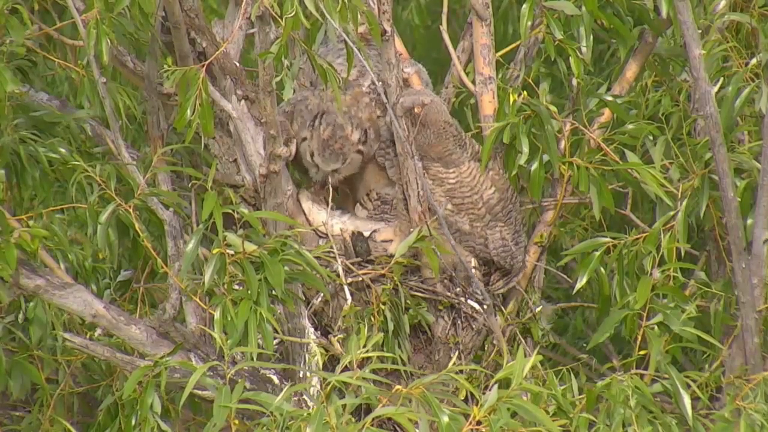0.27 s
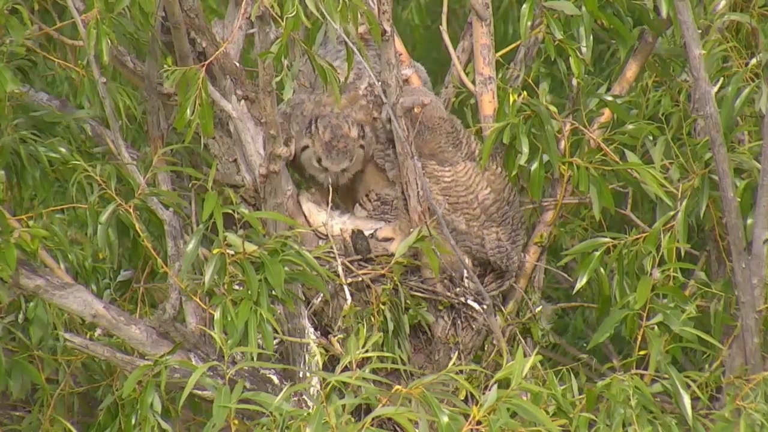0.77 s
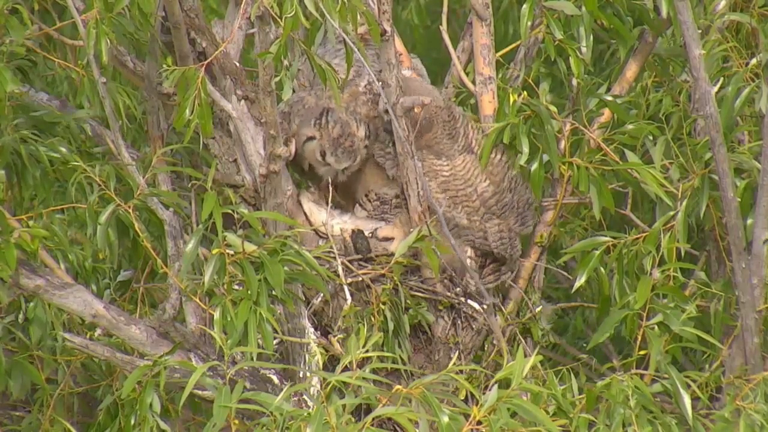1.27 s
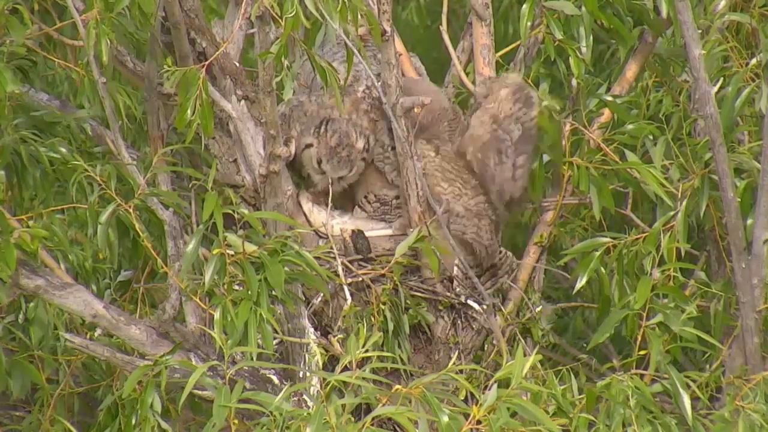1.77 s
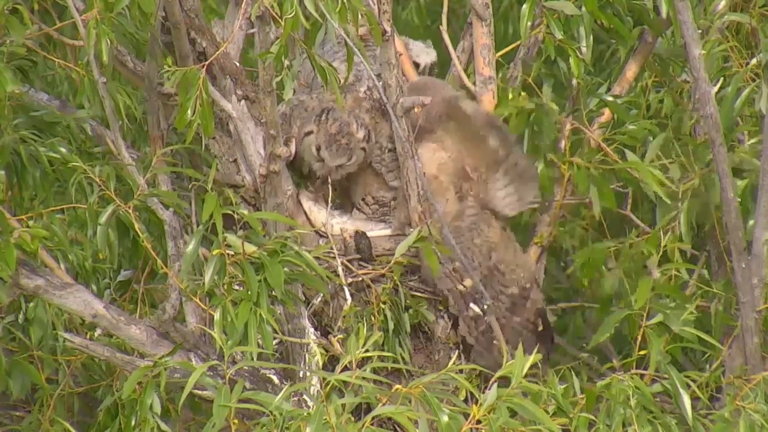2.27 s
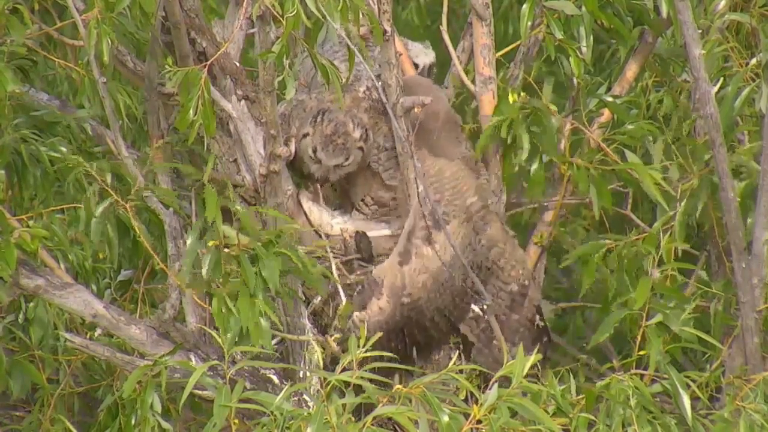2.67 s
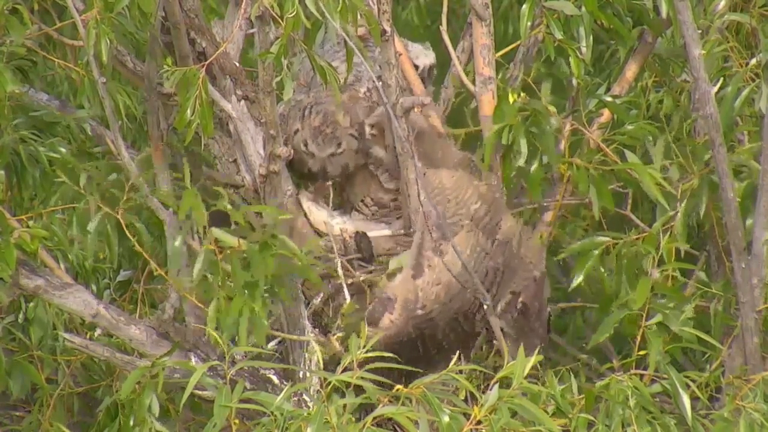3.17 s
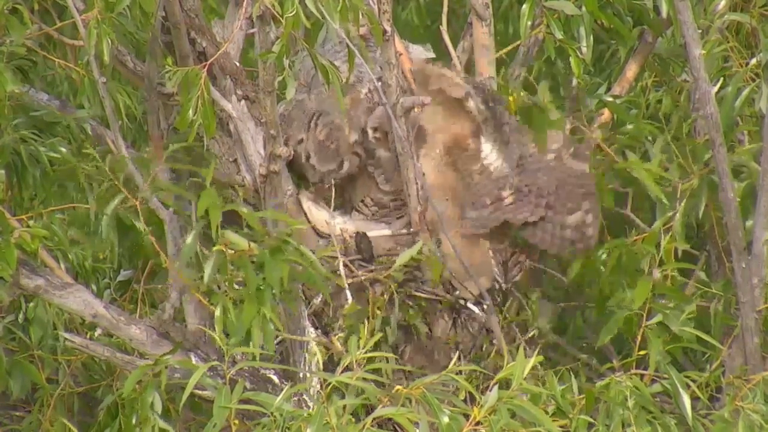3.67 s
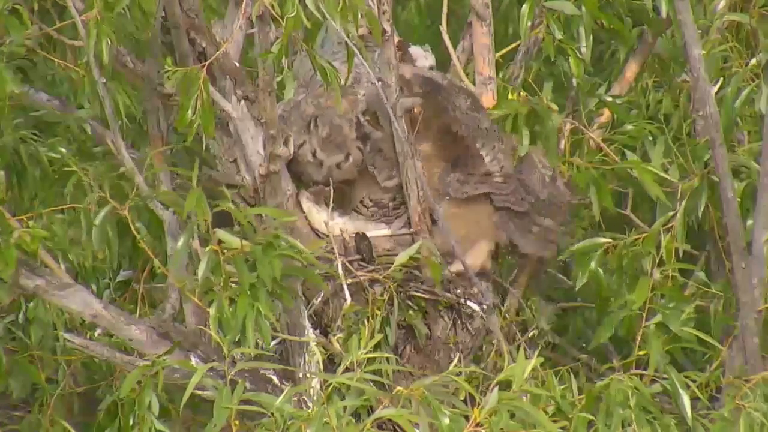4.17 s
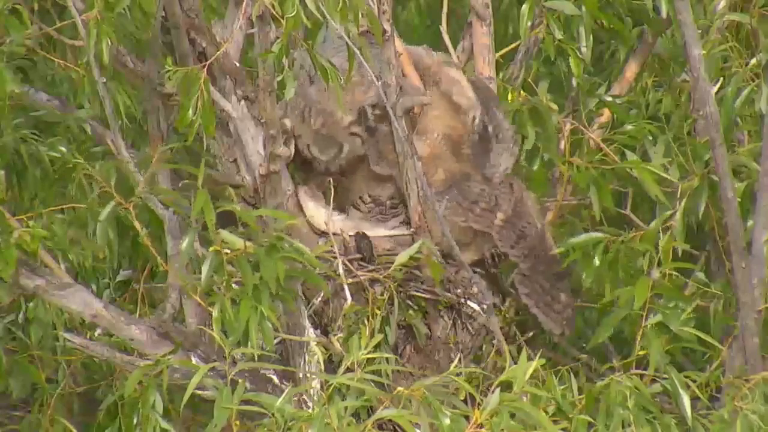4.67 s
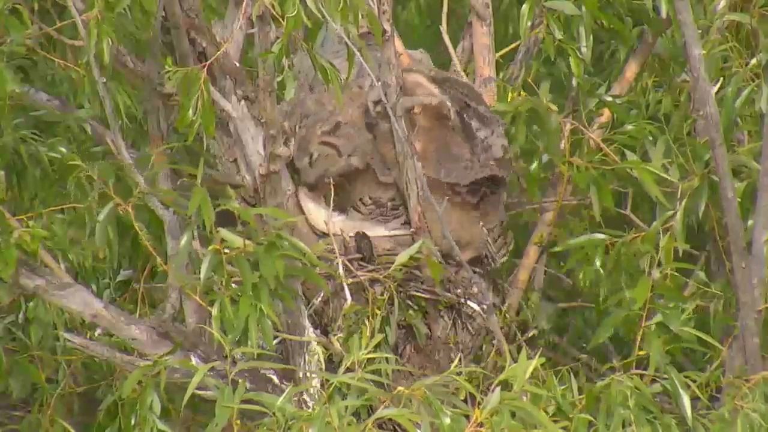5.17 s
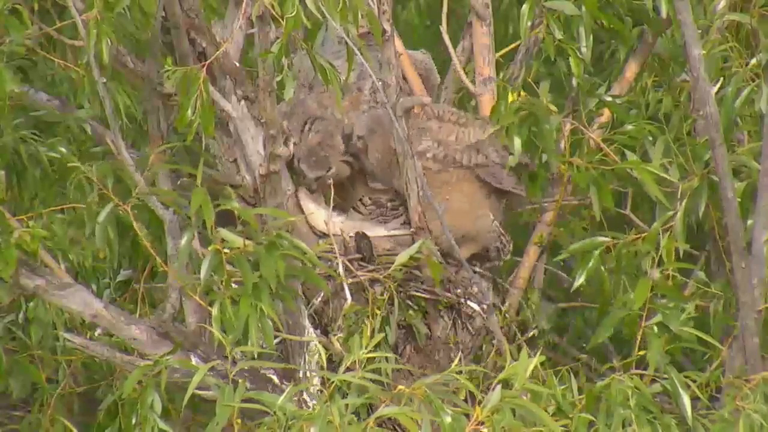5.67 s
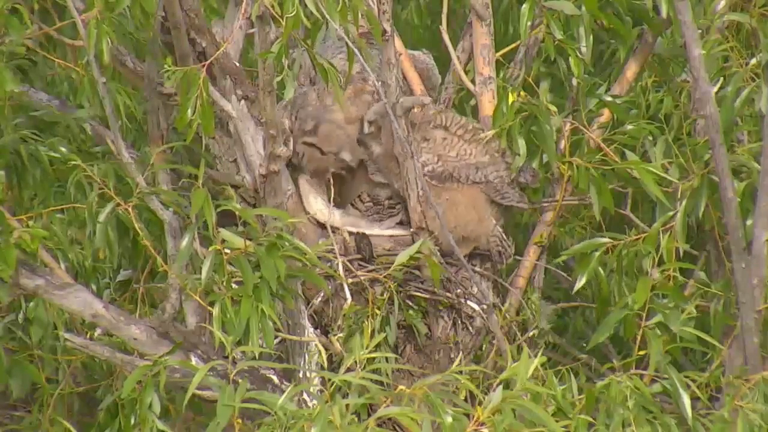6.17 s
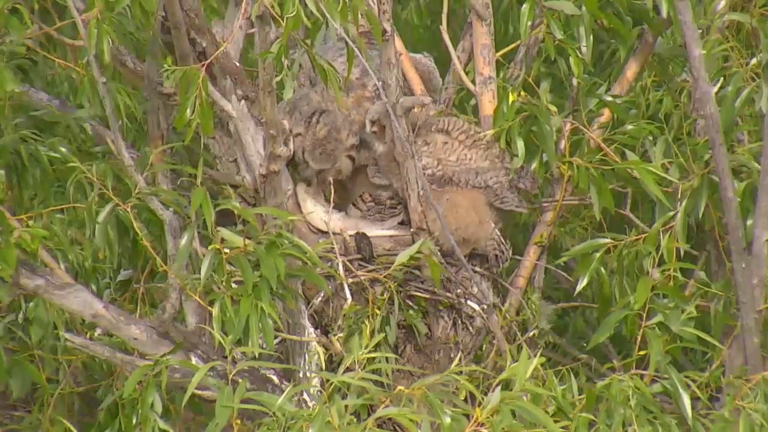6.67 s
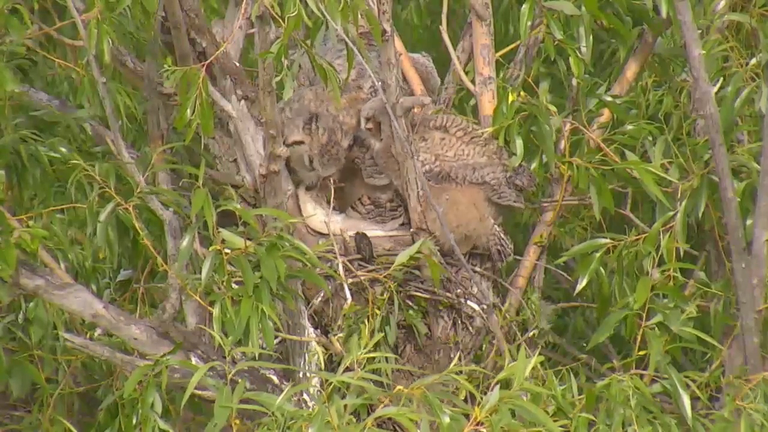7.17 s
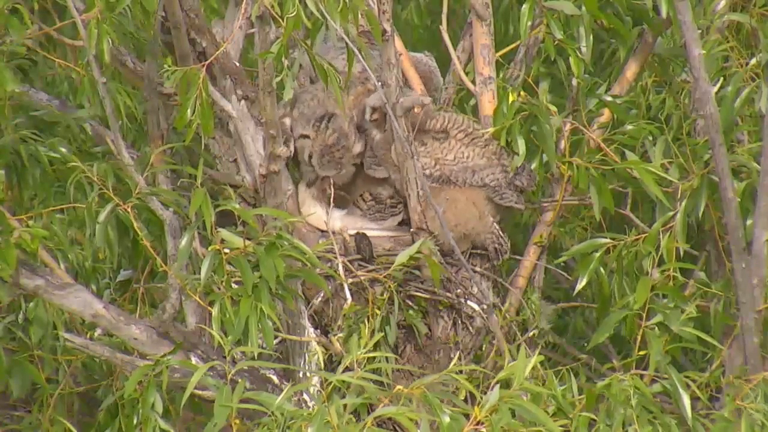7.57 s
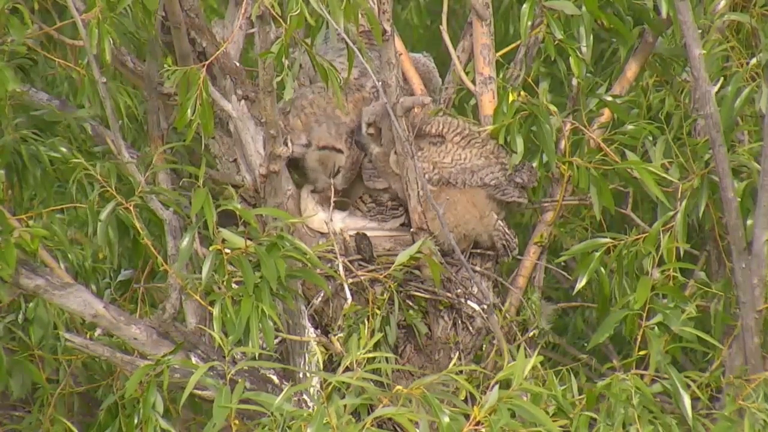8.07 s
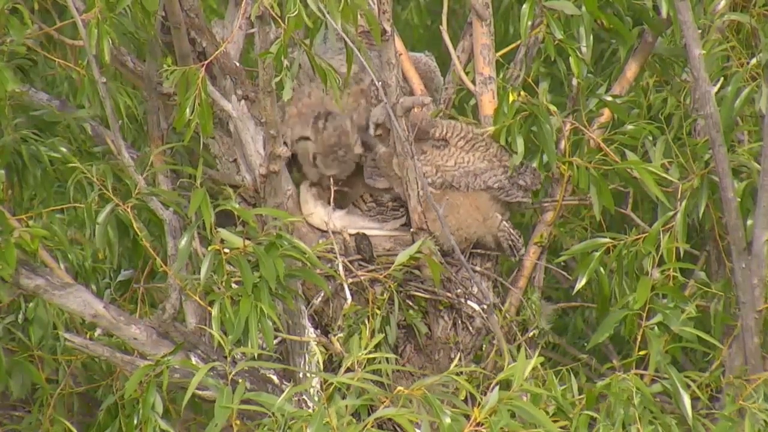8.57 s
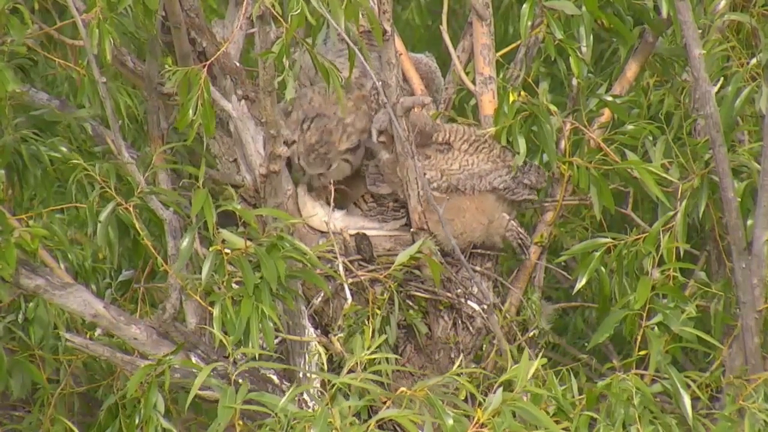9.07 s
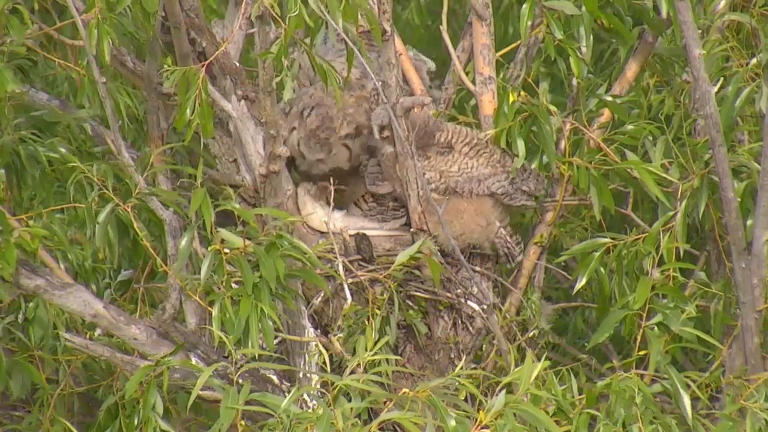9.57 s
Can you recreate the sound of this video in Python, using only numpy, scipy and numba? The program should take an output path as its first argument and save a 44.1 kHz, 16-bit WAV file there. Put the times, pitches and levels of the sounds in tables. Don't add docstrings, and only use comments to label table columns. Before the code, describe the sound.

Young owls in a tree nest give hoarse rasping begging calls, croaks and rising whines, with sharp beak snaps over low air rumble and faint hum.

```python
import sys
import numpy as np
from scipy import signal
from scipy.fft import rfft, irfft
from scipy.io import wavfile
from scipy.ndimage import uniform_filter1d
from numba import njit

SR = 44100
rng = np.random.default_rng(int(sys.argv[2]) if len(sys.argv) > 2 else 0)


def output_pcm(signal):
    pcm = np.clip(np.atleast_2d(signal).T, -1, 1) * 32767
    wavfile.write(sys.argv[1], SR, np.round(pcm).astype(np.int16))


def field_ratio(decibels):
    return 10 ** (np.asarray(decibels, dtype=float) / 20)


N = 432621
T = np.arange(N) / SR

# t/s, length/s, peak level/dB, place of peak/0-1, beak over throat/dB
RASPS = [
    [(-0.08, 0.5, -48.5, 0.34, 5)],
    [(8.084, 0.54, -49, 0.57, 1)],
    [(0.764, 0.57, -49.5, 0.56, -0.5)],
    [(3.289, 0.87, -52, .62, -2.5)],
    [(5.645, 0.56, -49, 0.72, -3.5)],
    [(2.42, 0.59, -52, 0.35, -8.5), (4.62, 0.67, -58, 0.1, -5.5), (6.93, .59, -50, 0.43, -7.5),
     (8.67, 0.35, -55.5, 0.6, -7), (9.09, 0.73, -56.5, 0.14, -4.5)],
]
# throat rise/dB, throat fall/dB, beak rise/dB, beak fall/dB, beak lead/0-1
MANNERS = [(4, 9.5, 15, 7, 0.02), (7.5, 3, 11.5, 4.5, 0), (6, 6, 12, 22.5, 0.24), (8.5, 15, 11, 48, 0.15),
           (11, 6, 4.5, -1, 0), (12, 13.5, 21, 19, 0.08)]
# f/Hz, level per Hz/dB
TRACTS = [
    [(1700, -33), (2350, -17), (2600, -16), (3000, -7), (3800, -3.5), (4450, -17), (4950, -16), (5500, -33)],
    [(1240, -35), (2370, -25), (2800, -9.5), (3500, -5), (3780, -1.5), (4100, -5), (5000, -11),
     (6500, -33.5)],
    [(1290, -60), (2300, -26), (2760, -21), (3050, -3), (3410, -10), (3670, 5), (4300, -6), (5300, -36)],
    [(1290, -32), (2630, -15.5), (2870, -6), (3180, -0.5), (4300, -14.5), (4750, -25), (5050, -25),
     (5700, -35)],
    [(1290, -28), (2230, -7), (2390, -18.5), (2680, -1), (3190, 11), (3450, 1), (5000, -15.5), (6500, -39)],
    [(1290, -50), (2300, -20), (2700, -7), (3170, 0.5), (3700, -15), (4350, -20), (5000, -37), (6500, -62)],
]
# f/Hz, level per Hz/dB
TRACT_END = [(11000, -120)]
# t/s, pitch f/Hz, effort level/dB
WHINES = [
    [(6.03, 611.4, -38), (6.07, 677, -45), (6.11, 689.6, -31), (6.18, 743, -38.5), (6.25, 777, -42),
     (6.31, 850, -38), (6.36, 888, -44), (6.41, 916, -44.5), (6.48, 915, -59)],
    [(6.895, 571.5, -36), (6.915, 605, -33.5), (6.965, 695, -30), (7., 730, -36), (7.04, 765, -44.5),
     (7.08, 780, -52)],
]
WHINE_CHEST = (-4, 10)
WHINE_TOP = [-34, -32]
# f/Hz, level/dB
WHINE_THROAT = [(1200, -49.5), (1600, -30), (2150, -27), (2360, -13.5), (2550, -7), (2900, -4), (3150, 0),
                (3560, -18)]
# t/s, length/s, peak level/dB, place of peak/0-1, low resonance at start f/Hz
CROAKS = [
    (0.688, 0.19, -48.5, 0.76, 1450),
    (1.314, .14, -43.5, 0.6, 1300),
    (4.471, .115, -41, 0.6, 1130),
    (5.814, 0.13, -48, 0.45, 1250),
]

# t/s, length/s, start f/Hz, end f/Hz, level/dB
STRANDS = [(2.68, .09, 3490, 3256, -43.5), (6.277, 0.076, 2550, 3050, -39.5),
           (6.29, 0.1, 1400, 2058, -56.5), (6.365, 0.0303, 2010, 1305, -60), (6.39, .09, 1970, 1980, -63),
           (8.715, 0.102, 3324, 3386, -52), (8.8, 0.1484, 3385, 3354, -51), (8.71, .03, 4165, 4200, -63),
           (8.775, 0.033, 4130, 4150, -59), (8.89, 0.034, 4194, 4070, -62)]
STREAKS = [(.69, 0.16, 2810, 3100, -54.5), (.78, .2, 4490, 4340, -55), (0, 0.43, 5000, 5060, -55.5),
           (3.31, .13, 3810, 4000, -55), (3.78, 0.26, 3460, 3200, -54), (6.26, 0.15, 3300, 3650, -56),
           (4.64, 0.31, 3180, 3170, -60), (6.1, 0.19, 2950, 3150, -45), (6.2, 0.22, 2450, 2950, -46.5),
           (6.96, 0.14, 2688, 2800, -43.5), (9.2, 0.532, 3240, 3320, -55)]
VOICED = [
    (.03, .2, 1170, 1222, -58),
    (.24, .19, 1228, 1160, -58),
    (6.06, .14, 1250, 1130, -68),
]
BREATHY = [
    (3.3, .33, 1140, 1270, -78),
    (5.7, .3, 1180, 1273, -76),
    (8.12, .5, 1210, 1233, -68),
]
YELPS = [(.815, .025, 1400, 1550, -54), (1.378, .025, 1150, 1600, -49), (3.455, .022, 1120, 1200, -55),
         (5.855, .03, 950, 1400, -54), (5.88, .03, 1200, 1600, -55)]
ARCHES = [(.838, .024, 1200, 1250, -53), (1.4, .042, 1000, 1250, -44), (4.541, .04, 1030, 1270, -41),
          (5.9, .055, 1050, 1140, -53)]
BEAK_OPENS = [(.765, .03, 3700, 4600, -58), (4.562, .022, 3200, 3900, -52), (5.643, .035, 3200, 5200, -57),
              (8.085, .04, 3200, 5600, -66)]
BEAK_SHUTS = [(.35, .075, 5150, 4800, -57), (6.11, .088, 5400, 3700, -60), (8.6, .045, 6400, 2600, -65)]
WHISTLES = [
    (.56, .11, 960, 950, -69),
    (2.43, .1, 3400, 3750, -64),
    (5.36, .22, 4200, 4080, -74),
    (6.69, .07, 2130, 2120, -59),
    (6.75, .12, 4150, 4150, -79),
    (8.67, .05, 3650, 3620, -65),
    (9.68, .14, 4100, 4080, -70),
]
# multiple, level/dB
VOICED_ORDERS = [(1, 0), (2, -6.5)]
# multiple, level/dB
YELP_ORDERS = [(1, -9), (2, 0), (3, -27)]

# t/s, peak level/dB, hollow level/dB, brightness f/Hz
SNAPS = [
    (1.248, -17.5, -22, 3440),
    (1.6937, -37, -27, 3010),
    (4.7033, -33, -8, 3240),
    (4.9134, -18.5, -13, 2765),
    (5.099, -18.5, -13.5, 2900),
    (7.3234, -24, -19, 2866),
    (7.4683, -37, -16.5, 3080),
         (.418, -37, -28, 3000), (2.279, -46, -28, 3500), (2.298, -47, -28, 3550), (2.753, -42, -28, 2400),
         (3.822, -39, -28, 3200), (3.465, -42, -20, 2700), (5.575, -46, -26, 3000), (5.698, -39, -28, 3100),
         (6.832, -52, -3, 3200)]
# f/Hz, width/Hz, level/dB
BEAK_MODES = [(1260, 230, 5), (840, 340, 1), (2430, 194, -6.5), (4790, 1100, -16.5)]
# t/s, length/s, level/dB, depth of beat/0-1
TRILLS = [
    (1.298, 0.114, -70, .8),
    (1.886, 0.42, -70, .3),
    (2.797, 0.33, -70, 0.9),
    (3.849, 0.365, -72, .4),
    (4.748, .55, -69.5, 0.7),
    (8.704, 0.19, -71, .8),
]
# f/Hz, level per Hz/dB
AIR = [(25, -21.5), (55, -20), (90, -23), (124, -30), (290, -38.5), (900, -44), (2100, -44.5),
       (2700, -35.5), (3500, -41), (4800, -53.5), (6000, -56), (8000, -58.5), (12000, -65.5), (16000, -67)]
# f/Hz, level/dB
HUM = [(60, -70), (120, -64), (180, -69), (240, -72), (300, -77), (360, -79), (420, -82), (540, -81),
       (600, -81), (660, -81), (720, -82), (4881, -86), (7800, -97), (1914, -80), (6667, -94), (7681, -94),
       (7920, -92), (13333, -95)]


def begging():
    out = 0
    for rows, manner, tract in zip(RASPS, MANNERS, TRACTS):
        rise, fall, beak_rise, beak_fall, lead = manner
        for s, length, db, peak, beak_db in rows:
            t, u = course(s, length)
            throat = db + swell(u, peak, rise, fall)
            beak = db + beak_db + swell(u, peak - lead, beak_rise, beak_fall)
            table = np.transpose([t, throat, beak])
            out = out + calls([table], rasp(tract + TRACT_END), 0.0035)
    return out


def rasp(tract):
    def voice(throat_db, beak_db):
        size = len(throat_db)
        bursts = rng.standard_normal(size) * field_ratio(0.89 * walk(181.3, size=size))
        f, sound = colour(bursts, tract)
        upper = np.clip((f - 3500) / 400 + .5, 0, 1)
        throat = unit(irfft(sound * (1 - upper), size))
        beak = unit(irfft(sound * upper, size))
        return field_ratio(throat_db) * throat + field_ratio(beak_db) * beak
    return voice


def whines():
    tables = [[row + (chest,) for row in rows] for rows, chest in zip(WHINES, WHINE_CHEST)]
    return calls(tables, whine, 0.0087)


def whine(hz, db, chest_db):
    rough = np.linspace(.25, 1, len(hz))
    throat_hz, throat_db = np.transpose(WHINE_THROAT)

    def throat(f):
        return field_ratio(np.interp(np.log(f), np.log(throat_hz), throat_db))

    second = field_ratio(chest_db) * throat(2 * hz) * overtone(2 * hz, .5 * rough)
    third = field_ratio(-chest_db / 2) * throat(3 * hz) * overtone(3 * hz, 0.56 * rough)
    fourth = throat(4 * hz) * overtone(4 * hz, rough)
    fifth = field_ratio(WHINE_TOP[0]) * overtone(5 * hz, rough)
    sixth = field_ratio(WHINE_TOP[1]) * overtone(6 * hz, rough)
    return field_ratio(db) * (second + third + fourth + fifth + sixth)


def croaks():
    rise_db, fall_db = 15.5, 19
    tables = []
    for s, length, db, peak, start_hz in CROAKS:
        t, u = course(s, length)
        level = db + swell(u, peak, rise_db, fall_db)
        low_hz = start_hz + (1450 - start_hz) * u
        high_hz = 0.56 * start_hz + 1933 + (1780 - 1933) * u
        low_db = -4.5 + (-28 + 4.5) * u
        tables.append(np.transpose([t, level, low_hz, high_hz, low_db]))
    return foliage(calls(tables, croak, 0.0101))


def croak(db, low_hz, high_hz, low_db):
    clicks = unit(pulses(np.linspace(130.8, 197.5, len(db)), .06))
    drive = clicks * field_ratio(2.0 * walk(90, size=len(db))) + 1.1 * rng.standard_normal(len(db))
    low = unit(band(drive, low_hz, 330))
    middle = unit(band(drive, high_hz, 870))
    top = unit(band(drive, 3570, 540))
    return field_ratio(db) * (middle + field_ratio(-25) * top + field_ratio(low_db) * low)


def call_details():
    out = notes(STRANDS, [(0.99, 0.0059)], .3) + notes(STREAKS, [(1, 0)], .65)
    out = out + notes(VOICED, VOICED_ORDERS, .25) + notes(BREATHY, VOICED_ORDERS, 1.)
    out = out + notes(YELPS, YELP_ORDERS, .15) + notes(ARCHES, YELP_ORDERS, .15, bend=2)
    beak_opens = notes(BEAK_OPENS, [(1, 0)], .6, bend=.78)
    beak_shuts = notes(BEAK_SHUTS, [(1, 0)], .45, bend=.25)
    return out + beak_opens + beak_shuts


def snaps():
    out, t = np.zeros(N), T[:int(.12 * SR)]
    for s, db, hollow_db, bright_hz in SNAPS:
        first_hit = -np.exp(-((t - .0009) / .00006) ** 2)
        second_hit = -0.28 * np.exp(-((t - .0028) / .00006) ** 2)
        tick = first_hit + second_hit
        ring = [field_ratio(d) * unit(band(tick, f, w)) for f, w, d in BEAK_MODES]
        top = unit(band(tick, bright_hz, 1050)) + ring[2] + ring[3]
        hollow = (ring[0] + ring[1]) / abs(ring[0]).max()
        decay = np.exp(-t / 0.023) * np.clip((t - .003) / 0.00204, 0, 1)
        scatter = band(rng.standard_normal(len(t)), 2640, 1500) * decay
        shot = top / abs(top).max() + field_ratio(hollow_db) * hollow + 0.21 * scatter
        a = int(s * SR)
        out[a:a + len(t)] += field_ratio(db) * shot
    return foliage(out)


def foliage(x):
    lowpass = signal.cheby1(6, 1, 4700, fs=SR, output="sos")
    return signal.sosfilt(lowpass, x) + field_ratio(-70) * x


def tree_echo(voices):
    t = T[:int(.25 * SR)]
    trees = rng.standard_normal(len(t)) * np.exp(-t / 0.054) * (t > .004)
    return field_ratio(-11.0) * signal.fftconvolve(voices, trees / np.sqrt(np.sum(trees ** 2)))[:N]


def whistles():
    return notes(WHISTLES, [(1, 0)], .08)


def far_honk():
    t, u = course(4.04, .3)
    shut = swell(u, .36, 0.75, 1)
    level = -66.5 + swell(u, 0.15, 3, 7.9)
    table = np.transpose([t, level, 2300 + 660 * shut, 9 + 36 * shut])
    return calls([table], honk, 0.0144)


def honk(db, upper_hz, upper_db):
    drive = pulses(223 + 0 * db, 0.022)
    low = unit(band(drive, 1000, 450))
    upper = unit(band(drive, upper_hz, 1100))
    return field_ratio(db) * (low + field_ratio(upper_db) * upper)


def insects():
    tables = [[(s, db, depth), (s + length, db, depth)] for s, length, db, depth in TRILLS]
    return calls(tables, insect, 0.054)


def insect(db, depth):
    stroke = np.cos(np.pi * 27.2 * T[:len(db)]) ** 4
    beat = 3.0 - np.clip(depth, 0, 1) * (3 - stroke)
    return field_ratio(db) * unit(beat * band(rng.standard_normal(len(db)), 4280, 300))


def air():
    f, noise = colour(rng.standard_normal(N), AIR)
    out, slow = 0, walk(0.81)
    for place in np.arange(3, 15.):
        lively = np.exp(-((place - 11.6) / 0.55) ** 2)
        share = np.clip(1 - abs(np.log2(f) - place), 0, 1)
        chorus_db = lively * (0.23 * slow + 1.7 * walk(7.1))
        out = out + irfft(noise * share, N) * field_ratio(chorus_db + .5 * walk(4))
    return field_ratio(-55) * unit(out)


def hum():
    out = 0
    for hz, db in HUM:
        out = out + field_ratio(db + 0.44 * walk(2.8)) * np.sin(2 * np.pi * (hz * T + rng.random()))
    return out


def notes(table, orders, rough, bend=.66):
    out = np.zeros(N)
    for s, length, start, end, db in table:
        u = np.arange(int(length * SR)) / (length * SR)
        middle = start + bend * (end - start)
        hz = np.polyval(np.polyfit([0, .62, 1], [start, middle, end], 2), u)
        tones = sum(field_ratio(d) * overtone(k * hz, rough) for k, d in orders)
        note = np.sin(np.pi * u) ** .5 * field_ratio(db) * tones
        a = int(s * SR)
        out[a:a + len(u)] += note[:N - a]
    return out


def overtone(hz, rough):
    share, size = np.clip(rough, 0, 1), len(hz)
    wobble = 1 + 0.026 * share * walk(300, size=size)
    phase = 2 * np.pi * np.cumsum(hz * wobble) / SR
    tone = np.sqrt(2) * np.sin(phase) * field_ratio(2.4 * walk(200, size=size))
    breath = unit(band(rng.standard_normal(size), hz * (1 - 0.045 * share), 0.19 * hz * share))
    return np.sqrt(1 - share) * tone + np.sqrt(share) * breath


def pulses(hz, jitter):
    cycles = np.cumsum(hz * (1 + jitter * walk(150, size=len(hz)))) / SR
    return np.diff(np.floor(cycles), prepend=0)


def calls(tables, voice, fade):
    out = np.zeros(N)
    for rows in tables:
        s, *columns = np.transpose(rows)
        a, b = int(s[0] * SR), min(int(s[-1] * SR), N)
        edge = np.clip(np.minimum(T[a:b] - s[0], s[-1] - T[a:b]) / fade, 0, 1)
        out[a:b] += edge * voice(*(np.interp(T[a:b], s, c) for c in columns))
    return out


def course(s, length):
    u = np.linspace(max(-s / length, 0), 1, num=25)
    return np.maximum(s + length * u, 0), u


def swell(u, peak, rise, fall):
    peak = np.clip(peak, .05, .97)
    before = rise * (1 - u / peak) ** 2
    after = fall * ((u - peak) / (1 - peak)) ** 2
    return -np.where(u < peak, before, after)


def colour(x, points):
    hz, db = np.transpose(points)
    f = np.maximum(np.fft.rfftfreq(len(x), 1 / SR), 1)
    return f, rfft(x) * field_ratio(np.interp(np.log(f), np.log(hz), db))


def walk(rate, size=N):
    k = int(SR / rate)
    held = np.repeat(rng.standard_normal(size // k + 1), k)
    smooth = uniform_filter1d(uniform_filter1d(held, k), k)
    return unit(smooth[:size])


def band(x, hz, width):
    hz, width = hz + 0 * x, np.clip(width + 0 * x, 20, 8000)
    return svf(svf(x, hz, width), hz, width)


@njit
def svf(x, hz, width):
    y, b, l = np.empty(len(x)), 0., 0.
    for i in range(len(x)):
        g, k = np.tan(np.pi * hz[i] / SR), width[i] / hz[i]
        v = (b + g * (x[i] - l)) / (1 + g * (g + k))
        b, l, y[i] = 2 * v - b, l + 2 * g * v, k * v
    return y


def unit(x):
    return x / np.sqrt(np.mean(x ** 2))


def scene():
    voices = begging() + whines() + croaks() + call_details() + whistles()
    mix = voices + tree_echo(voices) + snaps() + far_honk() + insects() + air()
    return mix[None]


def band_limit(x):
    return signal.sosfilt(signal.butter(12, 15720, fs=SR, output="sos"), x)


def record(dry):
    mix = dry + hum() + .0203
    return band_limit(mix)


dry = scene()
out = record(dry)
output_pcm(out)
```